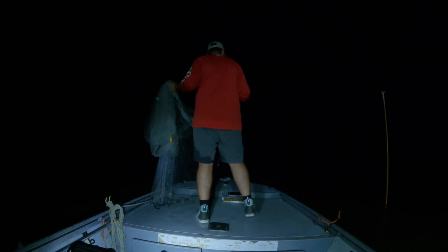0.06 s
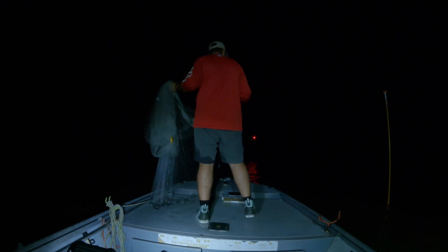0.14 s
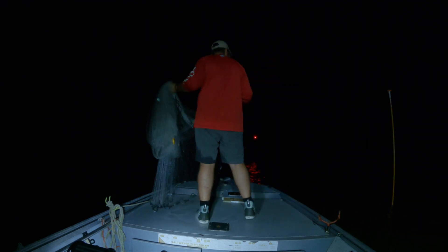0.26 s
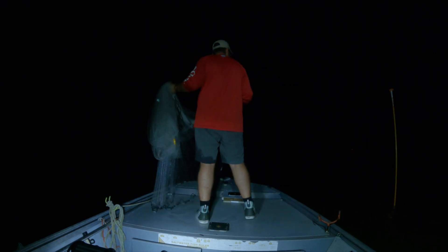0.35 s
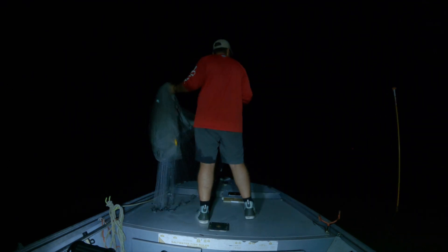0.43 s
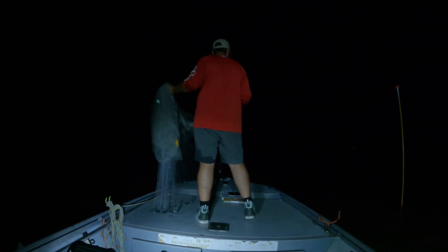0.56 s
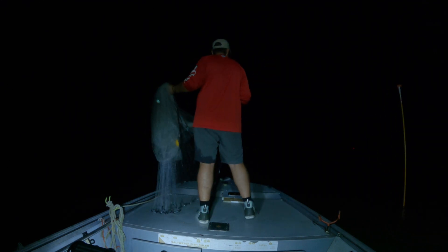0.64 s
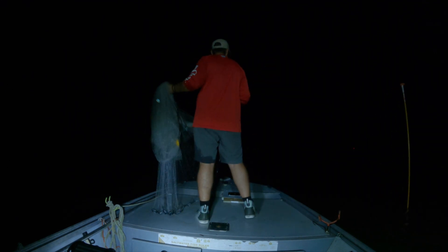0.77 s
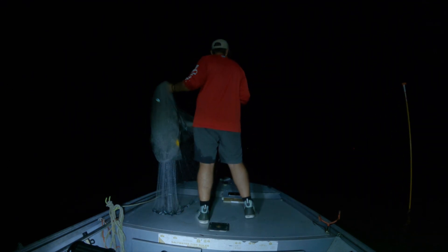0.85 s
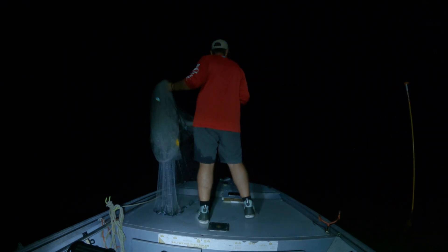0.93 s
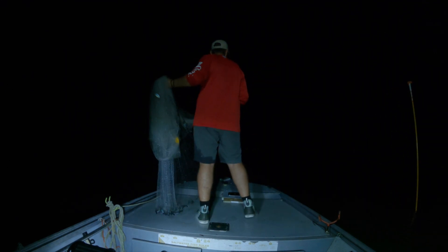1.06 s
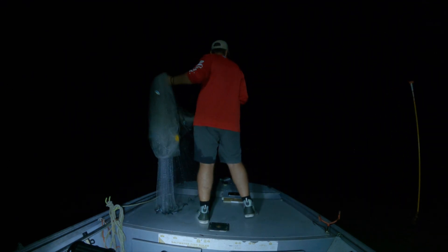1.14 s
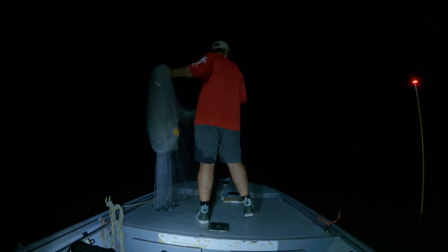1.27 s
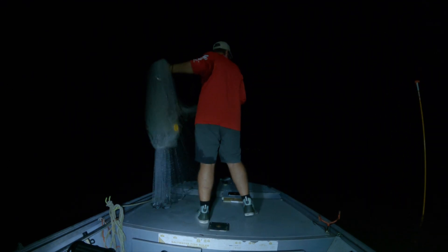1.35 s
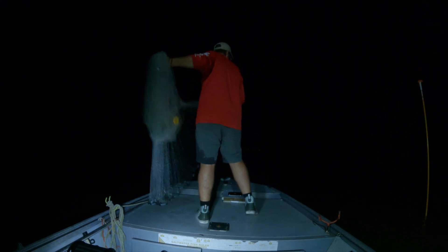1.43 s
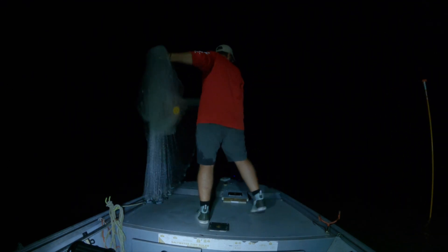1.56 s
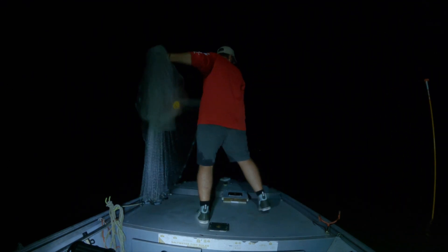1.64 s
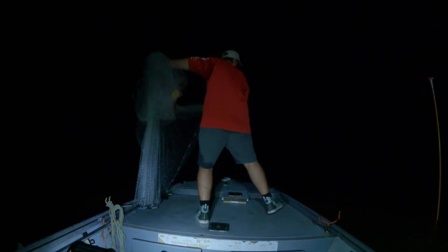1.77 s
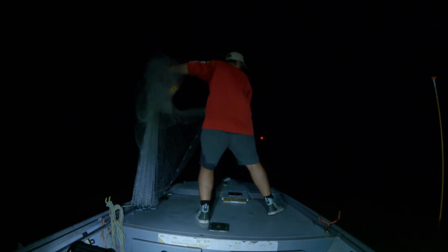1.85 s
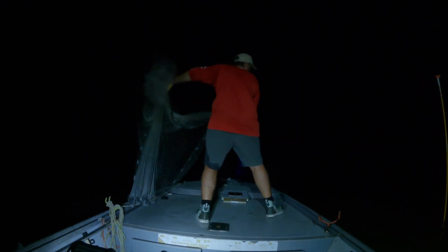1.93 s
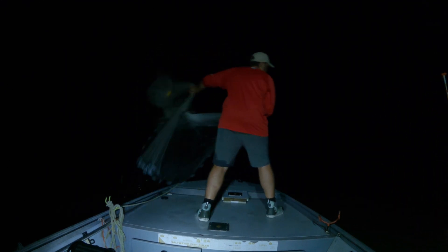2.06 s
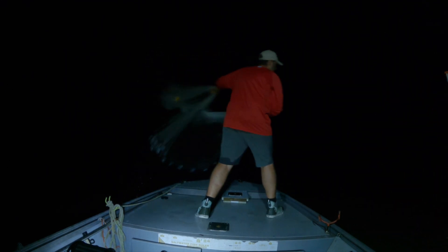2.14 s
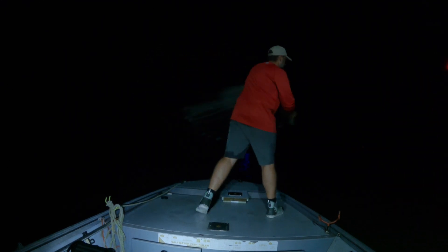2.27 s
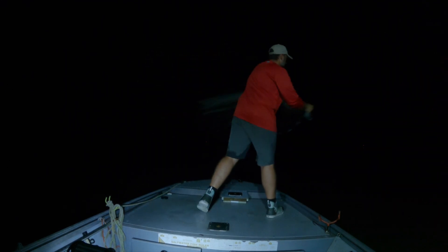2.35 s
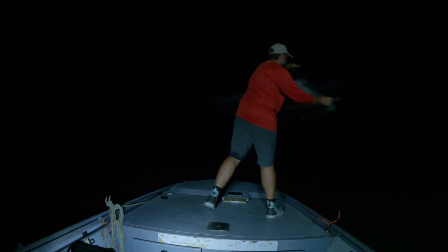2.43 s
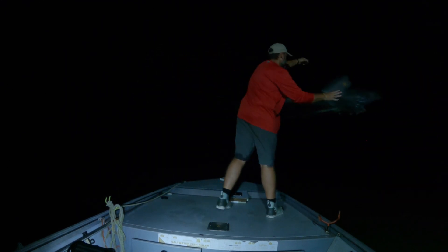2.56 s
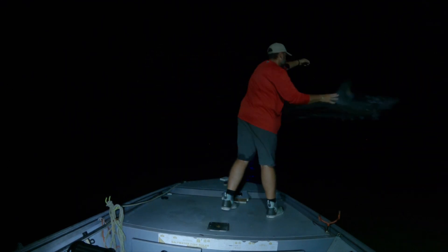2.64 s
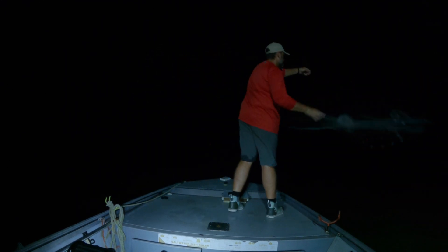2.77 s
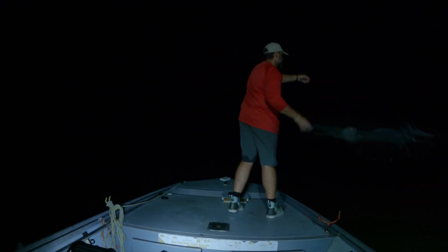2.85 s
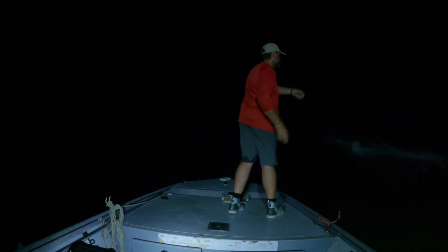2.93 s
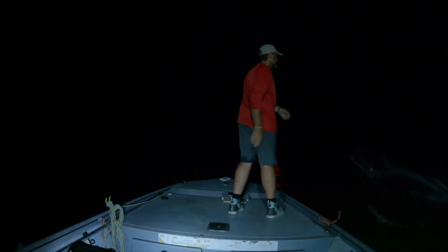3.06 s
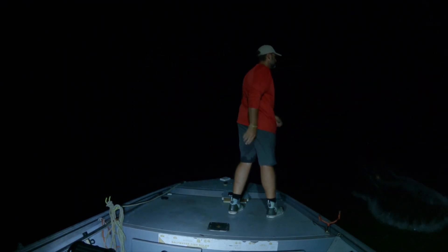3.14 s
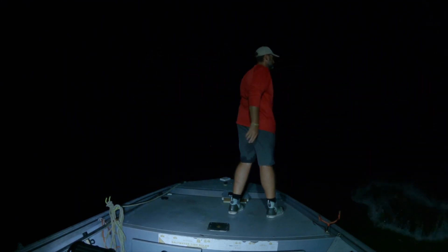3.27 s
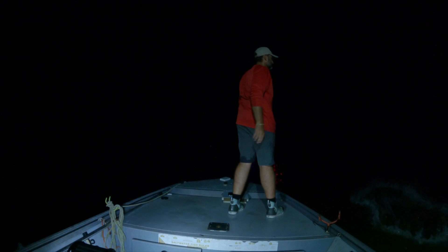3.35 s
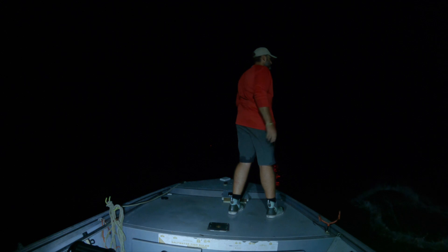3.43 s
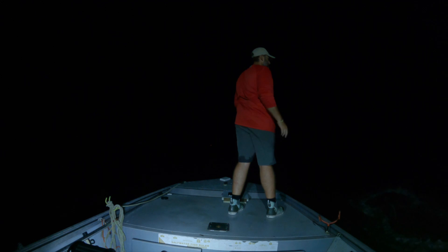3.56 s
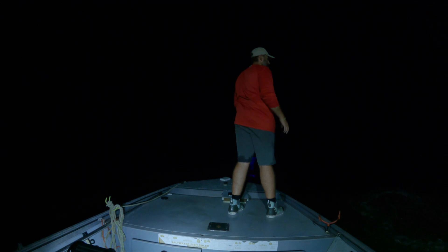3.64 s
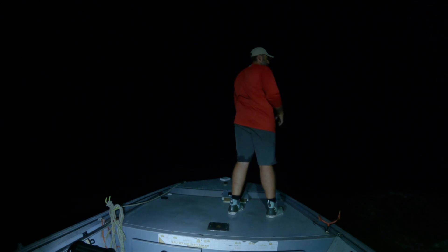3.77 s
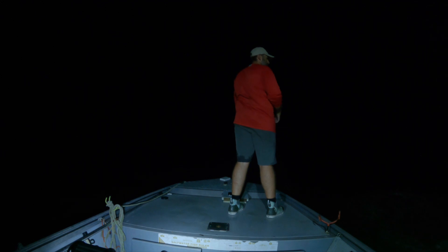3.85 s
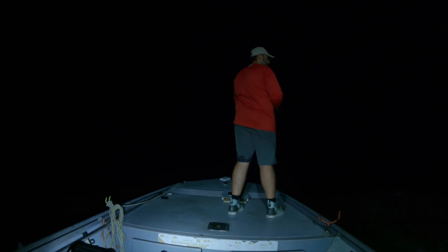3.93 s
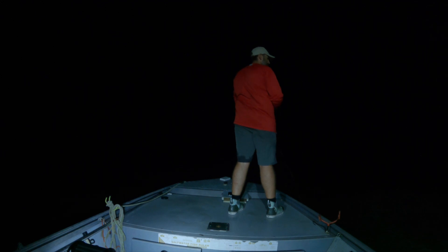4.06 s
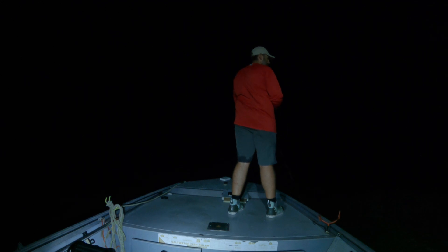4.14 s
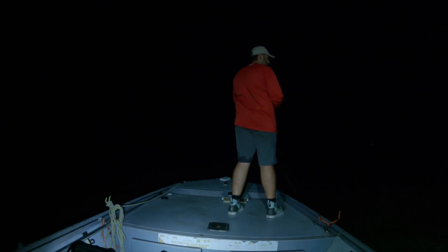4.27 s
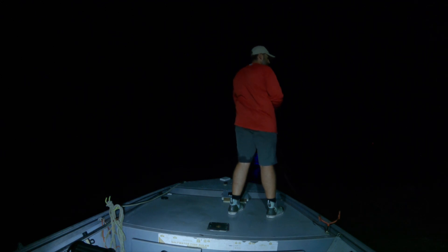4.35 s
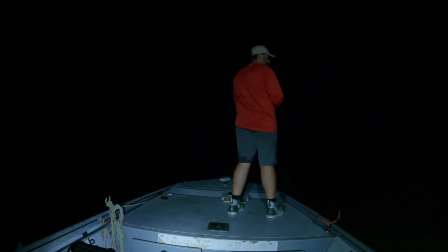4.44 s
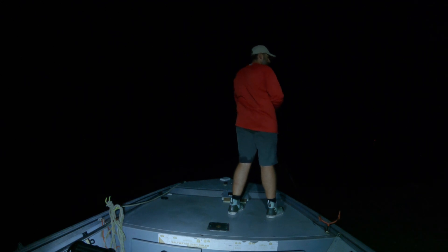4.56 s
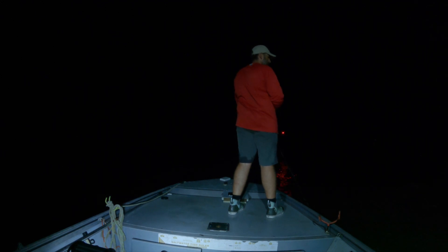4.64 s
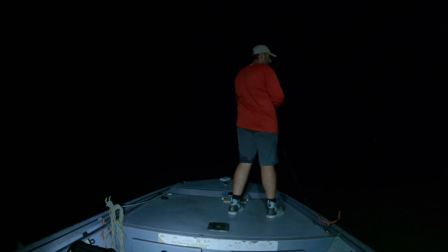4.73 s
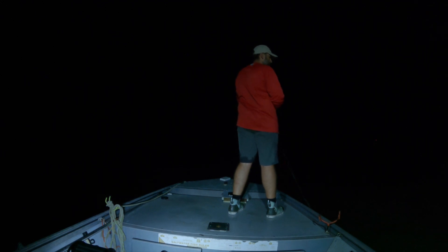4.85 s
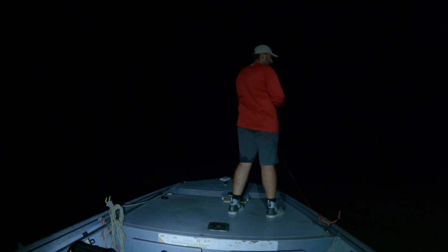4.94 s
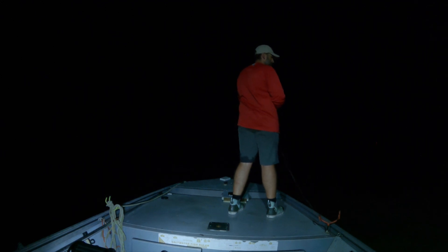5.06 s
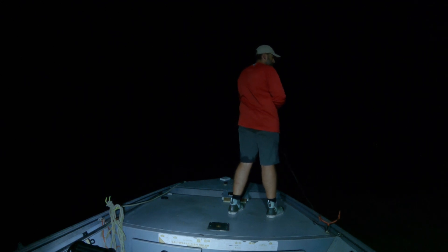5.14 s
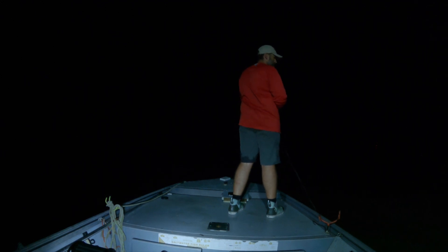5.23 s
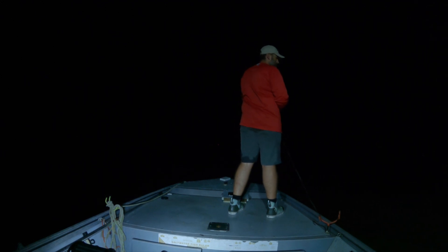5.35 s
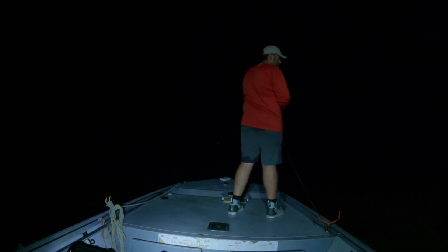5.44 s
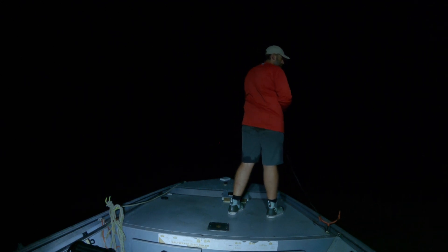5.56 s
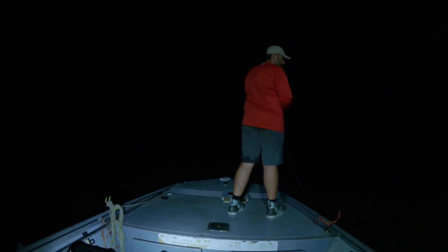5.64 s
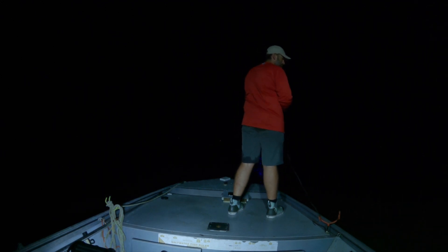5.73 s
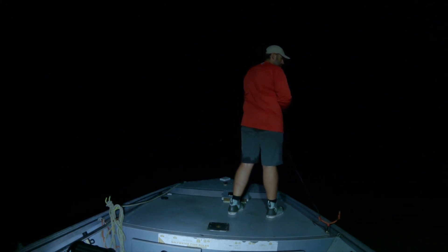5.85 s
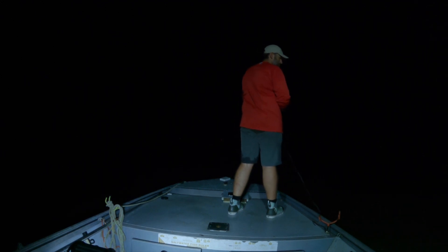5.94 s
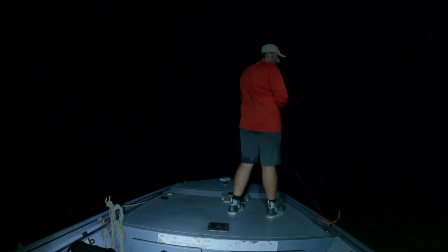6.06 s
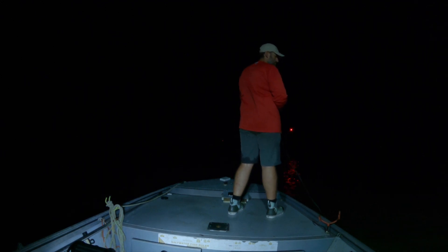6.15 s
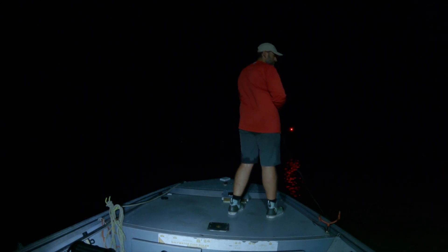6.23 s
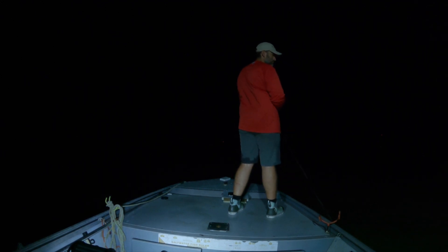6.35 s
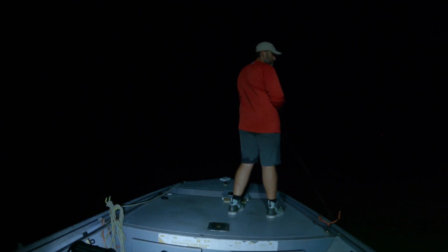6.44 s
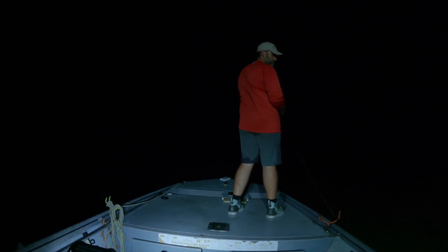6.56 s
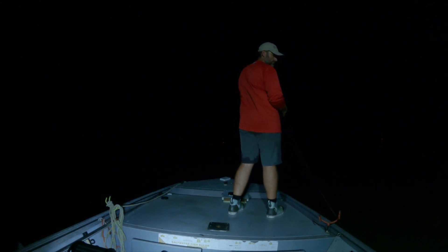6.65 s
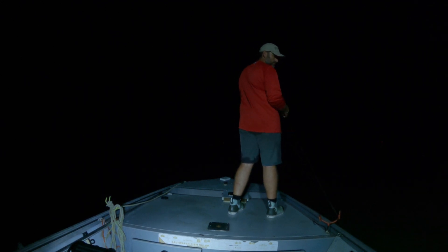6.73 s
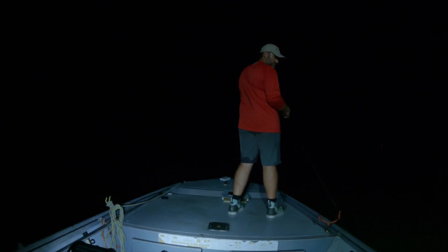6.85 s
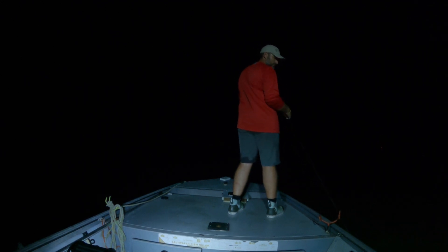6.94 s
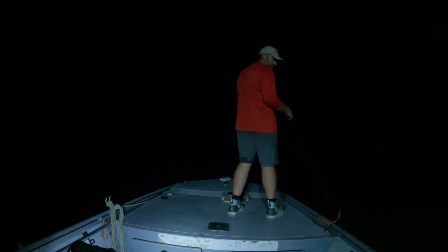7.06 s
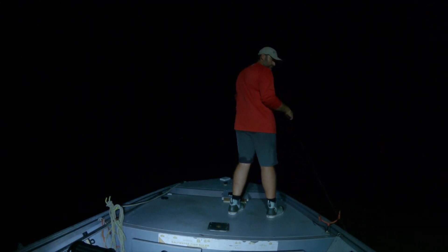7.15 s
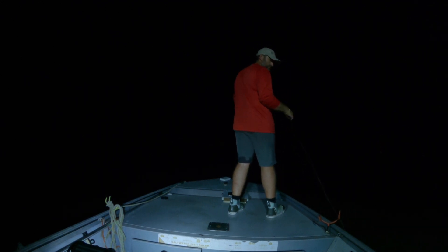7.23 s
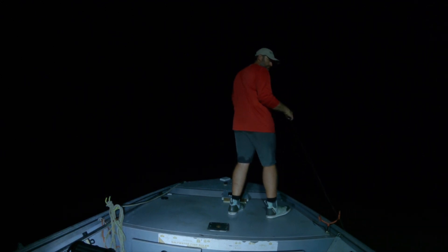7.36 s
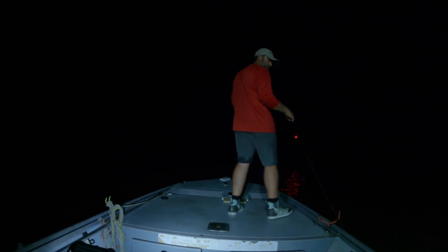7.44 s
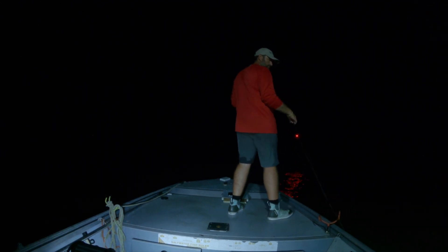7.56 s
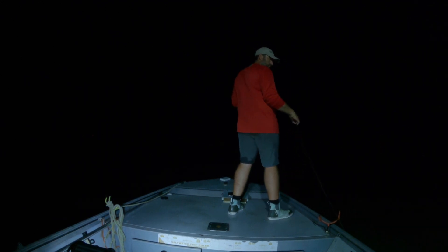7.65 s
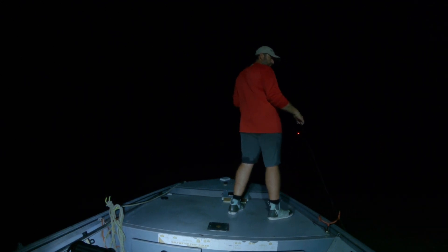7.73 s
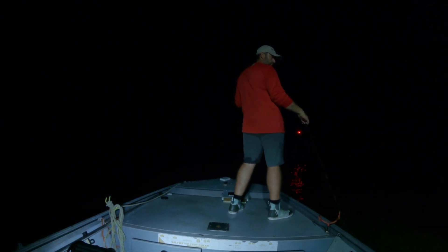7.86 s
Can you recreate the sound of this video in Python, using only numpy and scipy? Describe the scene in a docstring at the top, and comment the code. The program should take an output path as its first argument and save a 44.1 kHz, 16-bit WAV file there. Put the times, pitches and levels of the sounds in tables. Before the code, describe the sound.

Throughout about eight seconds, a small boat motor idles as a low, slightly wavering drone near 90 hertz, with a hull panel swelling into deeper-toned booms, notably around 1.5, 5 and 7.1 seconds. Water laps with small bubbles, and soft low wind gusts buffet the onboard microphone. Faint hull knocks come before 1 second; wet net weights tick and rustle from 1.1, sharpest near 1.95. At 2.55 to 2.75 shoes thump the deck in a quick cluster. At 3.03 a faint hiss starts, and at 3.1 the net slaps the water: staggered splats, gurgle and bright spray, stopping abruptly near 3.4. Thrown drops patter back until about 3.9, with thin foam fizz fading. A deck thump lands at 3.9, another at 6.7. Hollow knocks follow at 4.75, 6.5 and 7.3, with small ticks and tiny wet squeaks, lapping livelier around 6.5. Open outdoors, the stereo width narrows after the splash.

```python
"""On a small boat at night a motor idles, heard as wavering sine orders with a hull panel booming on the fourth.
A cast net is thrown: its lead line slaps the water in staggered noise bursts, with ringing bubbles and hiss;
drops fall back and foam fizzes out. Leads, shoes and rope knock, tick and thump as resonant noise puffs.
Water laps as patchy noise with bubbles, and low-pitched noise gusts buffet the microphone as wind."""
import sys
import numpy as np
from scipy import signal
from scipy.fft import rfft, irfft, next_fast_len
from scipy.io import wavfile
from scipy.ndimage import uniform_filter1d

SR = 44100
rng = np.random.default_rng(int(sys.argv[2]) if len(sys.argv) > 2 else 0)


def wrap_up_sound(samples):
    """Save the sound to the file named by the first command line argument, as 16-bit audio."""
    columns = np.atleast_2d(samples).T
    # keep every value between -1 and 1, then stretch to whole-number steps
    tamed = np.clip(columns, -1, 1)
    steps = np.round(tamed * 32767).astype(np.int16)
    wavfile.write(sys.argv[1], SR, steps)


N = 348213
T = np.arange(N) / SR

# bunches of leads striking the water in turn [t/s, level/dB, f/Hz, t60/s, breadth/share of f]
LEAD_LANDINGS = [(3.035, -37, 7600, 0.27, 1.1), (3.05, -33.5, 1700, 0.11, 0.99),
                 (3.118, -14.5, 848, 0.068, 0.88), (3.132, -24.5, 3200, 0.036, 0.21),
                 (3.171, -32, 5200, 0.059, 1.4), (3.185, -20, 3650, 0.029, 0.21),
                 (3.226, -17.5, 1830, 0.06, 0.47), (3.25, -17, 646, 0.046, 0.31),
                 (3.334, -21.5, 900, 0.05, 0.69)]
# spectrum of the slap's low ring [f/Hz, relative level per Hz/dB]
GURGLE_SPECTRUM = [(130, -39), (270, 0.5), (550, 6), (1000, -6.5), (2000, -12), (5000, -60.5)]
# spectrum of torn water and falling drops [f/Hz, relative level per Hz/dB]
HISS_SPECTRUM = [(500, -24.5), (950, -2.5), (1900, -8.5), (3700, -14), (8000, -27.5), (15000, -25.5)]
# spectrum of the fizzing foam [f/Hz, relative level per Hz/dB]
FOAM_SPECTRUM = [(2000, -29), (4000, -5.5), (8000, -9.5), (15000, -11)]
# shoes and swell thumping the deck [t/s, level/dB, f/Hz, t60/s]
DECK_THUMPS = [(2.553, -24, 344, 0.12), (2.583, -24.5, 296, 0.15), (2.655, -12, 173, 0.074),
               (2.702, -13, 66, 0.13), (2.712, -11.5, 129, 0.073), (2.707, -16, 295, 0.036),
               (2.727, -14, 230, 0.048), (3.892, -11.5, 121, 0.051), (6.719, -13, 158, 0.052)]
# leads, rope and small waves knocking on the hull [t/s, level/dB, f/Hz, t60/s, softness/rise as share of t60]
HULL_KNOCKS = [(.548, -28.5, 523, 0.051, 0.023), (0.701, -32, 1000, 0.088, 0.053),
               (.84, -36, 810, .2, 0.065), (1.871, -28.5, 830, 0.063, 0.0051),
               (2.543, -32.5, 540, 0.11, 0.016), (2.79, -27.5, 690, 0.1, 0.077),
               (2.794, -35.5, 1170, 0.066, 0.067), (3.784, -23.5, 460, 0.11, 0.1),
               (4.35, -31, 800, 0.12, 0.087), (4.755, -22, 745, 0.2, 0.22), (6.524, -19.5, 410, 0.14, 0.11),
               (7.008, -30.5, 1300, 0.092, 0.052), (7.284, -23, 550, 0.14, 0.058),
               (7.319, -30.5, 1100, 0.062, 0.052), (7.325, -19, 493, 0.13, 0.04),
               (7.843, -32.5, 640, 0.12, 0.031)]
# wet mesh and leads ticking and rustling [t/s, level/dB, f/Hz, t60/s, breadth/share of f]
NET_TICKS = [(1.144, -37, 2360, 0.043, 0.97), (1.487, -34, 4170, 0.043, 0.32),
             (1.526, -35, 3100, 0.018, 0.31), (1.648, -45, 3900, 0.05, .3), (1.871, -37, 4000, 0.009, 2),
             (1.941, -24, 3860, 0.012, 1.5), (1.954, -34, 6500, 0.024, 2.4),
             (1.966, -29.5, 4000, 0.019, 1.9), (2.255, -29.5, 4100, 0.017, 0.98),
             (2.306, -37, 4200, 0.022, 0.43), (2.538, -38.5, 3700, 0.081, 0.83),
             (2.597, -35, 12800, 0.016, 0.63), (2.787, -26.5, 3400, 0.043, 0.44),
             (4.344, -39, 2900, 0.084, 0.28), (6.534, -36.5, 2300, 0.1, 0.4),
             (6.999, -33, 4500, 0.082, 2.3), (7.278, -43, 3870, 0.074, 0.51),
             (7.486, -39, 3000, 0.062, 1.2), (7.515, -43, 4500, 0.08, 1.7), (7.849, -31, 4080, 0.046, 0.89),
             (7.868, -28, 5350, 0.044, 1.6)]
# short wet squeaks and plops [t/s, level/dB, f/Hz, half length/s]
WET_SQUEAKS = [(0.738, -42.5, 886, 0.018), (0.85, -33, 489, 0.015), (4.49, -59, 2650, .009),
               (4.797, -57, 2580, 0.016), (5.255, -59, 2860, 0.014), (2.616, -35, 501, 0.0068),
               (2.726, -47.5, 1410, 0.011), (5.5, -57, 1850, 0.014), (7.016, -39, 2570, 0.015),
               (7.419, -46.5, 1850, 0.015)]
# brief sags of the idle speed [middle t/s, half length/s, drop f/Hz]
IDLE_SAGS = [(1.326, 0.297, 1.0), (4.191, 0.451, 0.449)]
# third order of the motor, the main drone [t/s, level/dB]
DRONE_LEVEL = [(0, -27), (1.1, -29.5), (2.6, -27), (4.05, -31.5), (5.5, -26), (6.08, -36), (6.6, -27),
               (7.9, -32)]
# hull panel booming in swells as the boat rocks [middle t/s, level/dB, half length/s]
PANEL_BOOMS = [(0.58, -36, 0.28), (1.46, -24.5, 0.15), (2.447, -33.5, 0.33), (3.362, -27.5, 0.083),
               (3.783, -36, 0.26), (4.246, -28.5, 0.11), (5.006, -26, 0.1), (5.248, -31, 0.091),
               (6.354, -36.5, 0.14), (7.099, -22, 0.13), (7.584, -30, 0.13)]
# weaker motor orders [multiple of the firing rate, level/dB]
WEAK_ORDERS = [(1, -38.5), (2, -38.5)]
# faint hum, before its waver [t/s, f/Hz, level/dB]
MOTOR_HUM = [(0, 634, -62), (1.2, 603.4, -58), (3, 611, -61), (3.5, 616, -84)]
# water along the hull [t/s, lapping level/dB, spray level/dB]
WATER_LEVELS = [(0, -41.5, -64), (.83, -38, -65.5), (1.14, -41, -66), (2.3, -39, -58), (2.7, -41.5, -64.5),
                (4, -38, -61.5), (5, -39, -65.5), (5.73, -37, -60), (6.35, -39, -66.5),
                (6.54, -33.5, -61.5), (6.95, -39.5, -57), (7.12, -41, -65.5), (7.42, -39, -59),
                (7.8, -39.5, -68)]
# spectrum of the lapping [f/Hz, relative level per Hz/dB]
LAPPING_SPECTRUM = [(90, -37), (160, 4.5), (270, -5), (450, -14.5), (650, -14.5), (1200, -22.5),
                    (3500, -56.5), (7000, -100)]
# spectrum of the fine spray [f/Hz, relative level per Hz/dB]
SPRAY_SPECTRUM = [(900, -39.5), (1600, 12), (2900, 7), (5000, -3), (8000, -20), (12000, -32),
                  (15000, -45.5)]
# wind on the microphone [t/s, gust level/dB]
GUST_LEVEL = [(.35, -32.5), (.85, -34), (1.6, -33), (2.4, -25.5), (3.1, -34.5), (4.05, -27.5), (4.8, -29.5),
              (5.1, -32), (5.8, -33), (6.6, -30)]
# spectrum of the wind buffeting [f/Hz, relative level per Hz/dB]
BUFFET_SPECTRUM = [(8, -2.5), (38, -1), (70, 4), (120, -0.5), (250, -22), (600, -60)]
# stereo image: it opens, then narrows to the middle [t/s, side gain level/dB]
SIDE_LEVEL = [(.25, -20), (.35, -10.5), (1.5, -4), (2.75, -0.5), (3.0, -10.5), (3.35, -23.5), (3.45, -66)]
# colour of the diffuse share [f/Hz, gain level/dB]
DIFFUSE_COLOUR = [(100, -17.5), (700, -12.5), (3000, -3.5), (8000, -3.5)]
# microphone capsule response [f/Hz, gain level/dB]
CAPSULE_RESPONSE = [(8200, -0.5), (9100, -10.5), (10000, -6), (12000, -18), (13200, -12), (15600, -23.5)]

TOUCH_S, TOUCH_DB = 3.03, -36.5  # the first leads touch and the hiss begins
SLAP_S, SLAP_RISE_S, SLAP_HOLD_S = 3.108, 0.022, 0.13  # the whole ring lands
SLAP_DB, SLAP_FALL_DB_PER_S = -26.5, 78
TEAR_DB, TEAR_FALL_DB_PER_S = -31, 212  # spray torn up by the landing
CLOSE_S, CLOSE_DB_PER_S = 3.35, 395  # the cavities close and the slap's gurgle stops
RAIN_S, RAIN_HALF_S, RAIN_DB, RAIN_GURGLE_DB = 3.545, 0.24, -40, -44  # thrown water falls back
DROPS_DB = -47  # single drops ring with a rising pitch
FOAM_DB, FOAM_DB_PER_S = -55.5, 8  # the foam fizzes out
LANDING_SOFT, TICK_SOFT = 0.07, 0.14  # rise as share of t60
KNOCK_BREADTH, SQUEAK_WIDTH = 0.62, 0.065  # share of pitch
SNAP_HZ, SNAP_DB = 11500, -12.5  # every tick also snaps in the top octave, relative to its own level
IDLE_HZ = 29.37  # firing cycles a second
PANEL_DB = -42  # the panel between its swells
EDGE_HZ = 15700  # upper band limit


def splash():
    """Leads punch cavities that ring low; torn water and falling drops hiss and crackle above."""
    rain = bell(RAIN_S, RAIN_HALF_S) * (T > TOUCH_S)
    closing = amp(-CLOSE_DB_PER_S * np.maximum(T - CLOSE_S, 0))
    low = amp(SLAP_DB) * held(SLAP_S, SLAP_RISE_S, SLAP_HOLD_S, SLAP_FALL_DB_PER_S) * closing
    low += amp(RAIN_GURGLE_DB) * rain
    high = amp(TOUCH_DB) * held(TOUCH_S, 0.086, SLAP_S - TOUCH_S, 60) + amp(RAIN_DB) * rain
    high += amp(TEAR_DB) * held(SLAP_S, 0.059, SLAP_HOLD_S / 2, TEAR_FALL_DB_PER_S)

    cavities = evened(colour(bubbles(1500, 249, 2300, 6.2, 2.3), GURGLE_SPECTRUM))
    slap = 0.44 * patchy(GURGLE_SPECTRUM, 2.6, 2.1) + 0.9 * cavities
    crackle = evened(colour(bubbles(5000, 782, 11100, 3.5, 2.6), HISS_SPECTRUM))
    spray = 0.55 * patchy(HISS_SPECTRUM, 1.5, 0.7) + 0.73 * crackle
    foam_level = amp(FOAM_DB) * held(SLAP_S, SLAP_RISE_S, 0, FOAM_DB_PER_S)
    foam = foam_level * patchy(FOAM_SPECTRUM, 1.1, 0.83)
    drops = amp(DROPS_DB) * rain * bubbles(600, 600, 2600, 12, 2.3, rise=0.17)
    leads = bursts([(*row, LANDING_SOFT) for row in LEAD_LANDINGS])
    return low * slap + high * spray + foam + drops + leads


def thumps():
    """The deck rings a few cycles, its pitch sagging, with some scrape on top."""
    out = bursts([(s, db, hz, t60, .5, .06) for s, db, hz, t60 in DECK_THUMPS])
    for s, db, hz, t60 in DECK_THUMPS:
        t = np.maximum(T - s, 0)
        envelope = amp(db - 60 * t / t60) * np.minimum(t * hz, 1)
        out += envelope * np.sin(2 * np.pi * hz * t * (1 - 3.3 * t))
    return out


def knocks():
    """Hull blows as short puffs of noise through one broad resonance each."""
    return bursts([(s, db, hz, t60, KNOCK_BREADTH, softness) for s, db, hz, t60, softness in HULL_KNOCKS])


def ticks():
    """Mesh and leads as high noise puffs, each with a quieter snap in the top octave."""
    body = bursts([(*row, TICK_SOFT) for row in NET_TICKS])
    snap = bursts([(s, db + SNAP_DB, SNAP_HZ, t60, .4, TICK_SOFT) for s, db, _, t60, _ in NET_TICKS])
    return body + snap


def squeaks():
    """Brief soft-edged whistles of narrow noise."""
    out, t = np.zeros(N + SR), np.arange(-SR // 10, SR // 10) / SR
    for s, db, hz, half in WET_SQUEAKS:
        width = SQUEAK_WIDTH * hz
        band = resonate(resonate(rng.standard_normal(len(t)), hz, width), hz, 2 * width)
        start = round((s + t[0]) * SR)
        out[start:start + len(t)] += amp(db) * np.exp(-(t / half) ** 2) * steadied(band, hz / 10)
    return out[:N]


def motor():
    """Orders of the firing cycle as wavering sines, the fourth swollen by the hull, plus a narrow noise hum."""
    speed_hz = IDLE_HZ - sum(drop_hz * bell(s, half) for s, half, drop_hz in IDLE_SAGS)
    cycle = 2 * np.pi * np.cumsum(speed_hz * (1 + 0.0028 * drift(5))) / SR
    out = amp(curve(DRONE_LEVEL)[0] + 0.67 * drift(28)) * np.sin(3 * cycle)
    # the fourth power gives each swell a flat top
    swells = sum(amp(db) * np.exp(-((T - s) / half) ** 4) for s, db, half in PANEL_BOOMS)
    boom = amp(PANEL_DB) + swells
    out += boom * amp(1.2 * drift(15)) * np.sin(4 * cycle + 0.47 * drift(6))
    for k, db in WEAK_ORDERS:
        out += amp(db + 3.1 * drift(2.9)) * np.sin(k * cycle + 2 * np.pi * rng.random())

    hum_hz, hum_db = curve(MOTOR_HUM)
    hum_hz = hum_hz + 10.0 * drift(2.5)
    hum = resonate(resonate(rng.standard_normal(N), hum_hz, 25), hum_hz, 45)
    out += amp(hum_db + 4.8 * drift(8.7)) * evened(hum)
    return np.sqrt(2) * out  # sine amplitudes from RMS levels


def water():
    """Lapping with scattered bubbles, and a fine spray with stray drips above it."""
    lap_db, spray_db = curve(WATER_LEVELS)
    pockets = evened(colour(bubbles(500, 250, 3460, 6, 3.2), LAPPING_SPECTRUM))
    lap = patchy(LAPPING_SPECTRUM, 1.8, 1.0) + 0.31 * pockets
    drips = bubbles(60, 1700, 3300, 13, 3.0)
    spray = patchy(SPRAY_SPECTRUM, 2.7, 0.51) + 0.21 * drips
    return amp(lap_db) * lap + amp(spray_db) * spray


def wind():
    """Lumpy low buffeting: the part common to both microphone ports and the part that differs."""
    gust = amp(curve(GUST_LEVEL)[0])
    tilted = [(hz, db + 1.2 * np.log2(hz / 60)) for hz, db in BUFFET_SPECTRUM]
    common = gust * patchy(BUFFET_SPECTRUM, 2.1, 1.3, size=2048)
    eddies = gust * amp(-10.0) * patchy(tilted, 3.0, 2.5, size=1024)
    return common, eddies


def bursts(rows):
    """Puffs of noise through one resonance, as broad as a share of its pitch, that swell and then die away."""
    out, t = np.zeros(N + SR), np.arange(SR // 6) / SR
    for s, db, hz, t60, breadth, softness in rows:
        width = breadth * hz
        puff = resonate(rng.standard_normal(len(t)), hz, width)
        puff = resonate(resonate(puff, hz, 2.1 * width), hz, 2.1 * width)
        start, u = round(s * SR), t / max(t60, .005)
        envelope = amp(db - 60 * u) * (1 - np.exp(-u / softness)) ** 2
        out[start:start + len(t)] += envelope * steadied(puff, hz)
    return out[:N]


def bubbles(per_s, low_hz, high_hz, cycles, spread_db, rise=0.056):
    """Air pockets ring a few cycles while their pitch rises; a few are much louder."""
    out, kinds = np.zeros(N), 20
    loudness = amp(spread_db * np.minimum(rng.exponential(1, N), 4))
    drops = (rng.random(N) < per_s / SR) * loudness
    kind = rng.integers(0, kinds, N)
    for k, hz in enumerate(np.geomspace(low_hz, high_hz, kinds)):
        u = np.arange(int(3 * cycles * SR / hz)) * hz / SR  # time in cycles
        envelope = np.exp(-2 * u / cycles) * np.minimum(u, 1) * np.sqrt(hz)
        ring = np.sin(2 * np.pi * u * (1 + rise * u / cycles)) * envelope
        out += signal.oaconvolve(drops * (kind == k), ring)[:N]
    return evened(out)


def patchy(points, patchy_db, flicker_db, size=512):
    """Noise of the given spectrum with drifting patches and a flicker shared by all pitches."""
    frames, hz = 4 * N // size + 5, np.fft.rfftfreq(size, 1 / SR)
    a, b, patches = rng.standard_normal((frames, len(hz), 3)).T
    patches = uniform_filter1d(patches, size=12, axis=0, mode="wrap")  # across pitch
    patches = evened(uniform_filter1d(patches, size=10, axis=1, mode="wrap"))  # across time
    flicker = evened(uniform_filter1d(rng.standard_normal(frames), size=6, mode="wrap"))
    z = (a + 1j * b) * amp(read(points, hz)[:, None] + patchy_db * patches + flicker_db * flicker)
    return evened(signal.istft(z, nperseg=size, noverlap=size - size // 4)[1][:N])


def resonate(x, hz, width):
    """Shifts hz down to zero, smooths, and shifts back: a resonance of gain 1."""
    turn = np.exp(2j * np.pi * np.cumsum(hz * np.ones(len(x))) / SR)
    r = np.exp(-np.pi * width / SR)
    return 2 * (turn * signal.lfilter([1 - r], [1, -r], x / turn)).real


def steadied(x, hz):
    """Evens out the slow wobble of a noise band: a blow is steadier than plain noise."""
    x = evened(x)
    power = abs(uniform_filter1d(x ** 2, int(3.0 * SR / hz)))
    return evened(x / (.5 + np.sqrt(power)))


def drift(top_hz):
    """Slow random wander of unit RMS, summed from sines up to the given rate."""
    t = T[::64]
    rates = np.geomspace(top_hz / 10, top_hz, 16)
    wander = sum(np.sin(2 * np.pi * (f * t + rng.random())) / np.sqrt(f) for f in rates)
    return evened(np.interp(T, t, wander))


def bell(middle_s, half_s):
    """A smooth swell of height 1."""
    return np.exp(-((T - middle_s) / half_s) ** 2)


def held(start_s, rise_s, hold_s, fall_db_per_s):
    """Attack, hold, then a steady fall in dB."""
    fall_s = np.maximum(T - start_s - rise_s - hold_s, 0)
    return np.clip((T - start_s) / rise_s, 0, 1) ** 2 * amp(-fall_db_per_s * fall_s)


def colour(x, points):
    """Filters by a gain curve over pitch."""
    size = next_fast_len(N + SR // 4)
    gain = amp(read(points, np.fft.rfftfreq(size, 1 / SR)))
    return irfft(rfft(x, size) * gain, size)[..., :N]


def read(points, hz):
    """Reads a curve in dB on a log pitch axis."""
    f, value = np.transpose(points)
    return np.interp(np.log(hz + 1), np.log(f + 1), value)


def curve(rows):
    """Draws each column after the first as straight lines over time."""
    s, *columns = np.transpose(rows)
    return [np.interp(T, s, c) for c in columns]


def evened(x):
    """Scales to unit RMS."""
    return x / np.sqrt(np.mean(x ** 2) + 1e-20)


def amp(db):
    """Turns dB into linear gain."""
    return 10 ** (np.asarray(db) / 20)


def scene():
    """Mixes the layers: motor in the middle, water and deck sounds partly diffuse, wind eddies at the sides."""
    near = splash() + thumps() + knocks() + ticks() + squeaks() + water()
    buffet, eddies = wind()
    # scattering off the deck reaches the two ports differently
    scatter = rng.standard_normal(1600) * np.exp(-np.arange(1600) / 350)
    diffuse = signal.oaconvolve(near, scatter / np.linalg.norm(scatter))[:N]
    side = amp(curve(SIDE_LEVEL)[0]) * (colour(diffuse, DIFFUSE_COLOUR) + eddies)
    side += colour(diffuse, [(7000, -70.5), (12000, 1.0)])  # the top octave always stays wide
    return motor() + near + buffet + np.array([side, -side])


def record(dry):
    """Capsule colour, then the band limit."""
    low_pass = signal.firwin(1023, EDGE_HZ, window=("kaiser", 9), fs=SR)
    return signal.oaconvolve(colour(dry, CAPSULE_RESPONSE), low_pass[None], "same")


dry = scene()
out = record(dry)
wrap_up_sound(out)
```